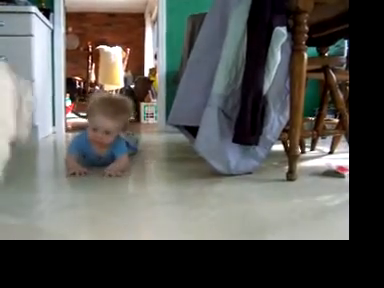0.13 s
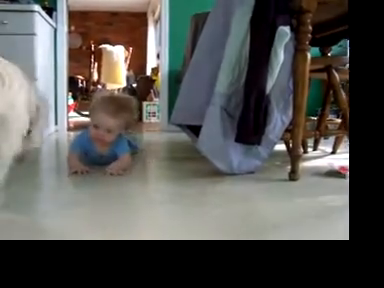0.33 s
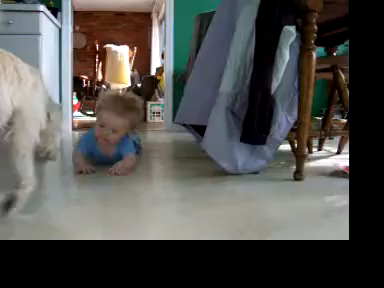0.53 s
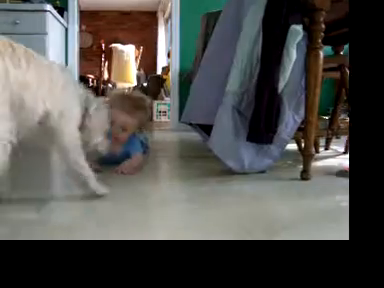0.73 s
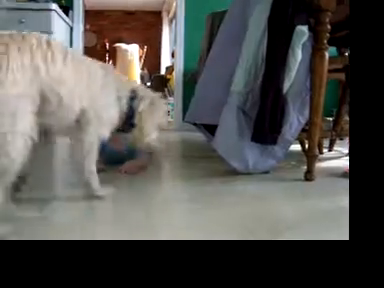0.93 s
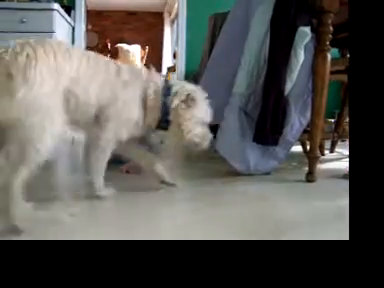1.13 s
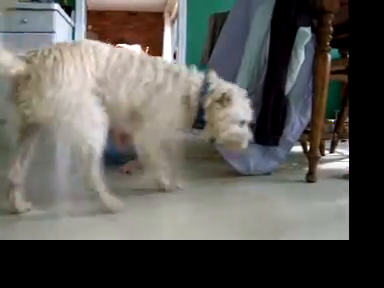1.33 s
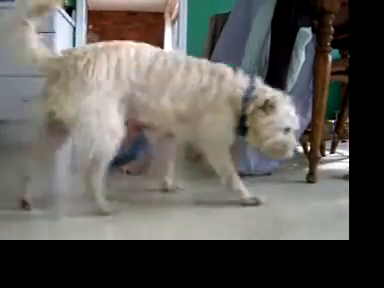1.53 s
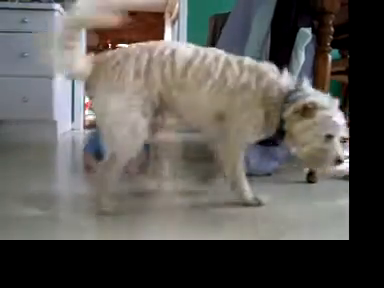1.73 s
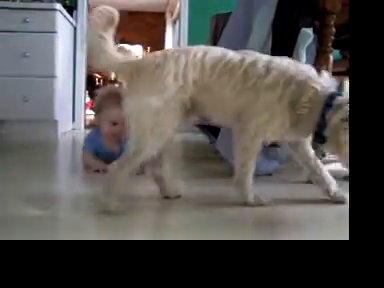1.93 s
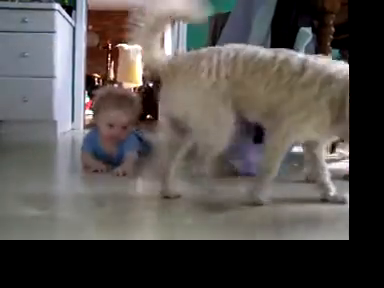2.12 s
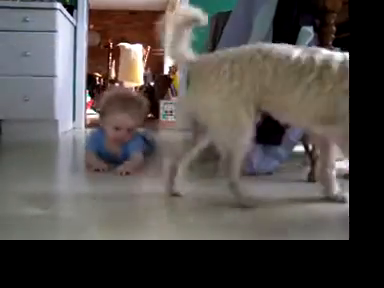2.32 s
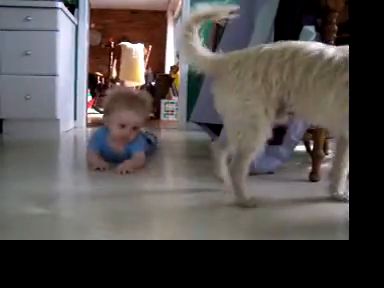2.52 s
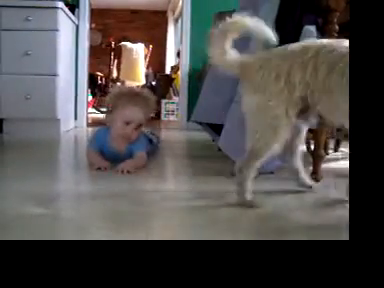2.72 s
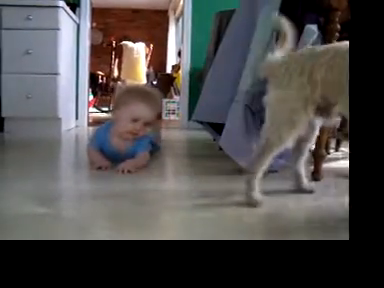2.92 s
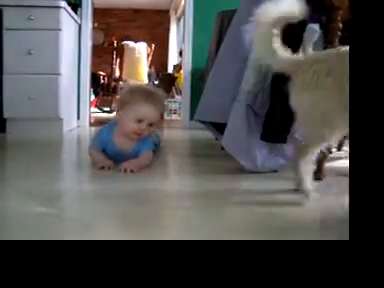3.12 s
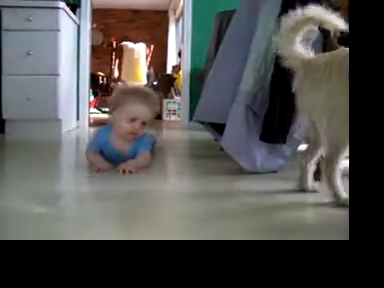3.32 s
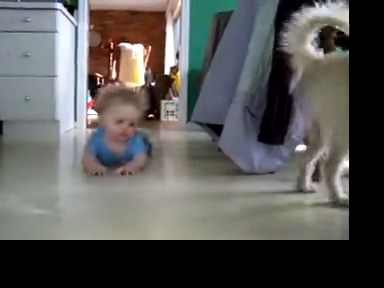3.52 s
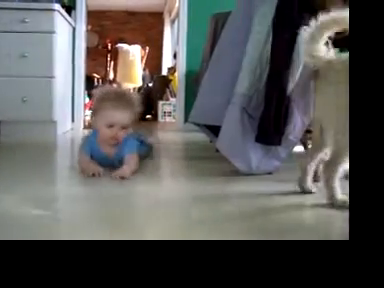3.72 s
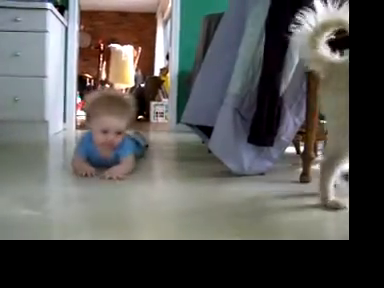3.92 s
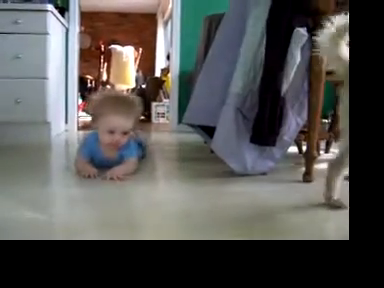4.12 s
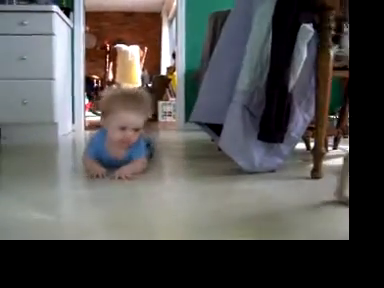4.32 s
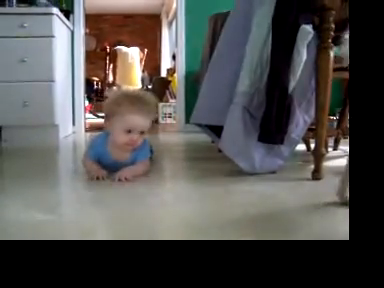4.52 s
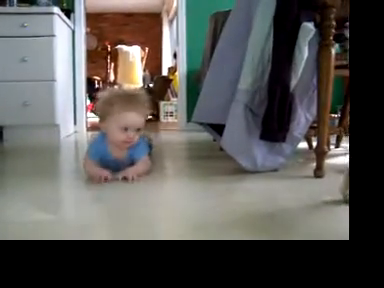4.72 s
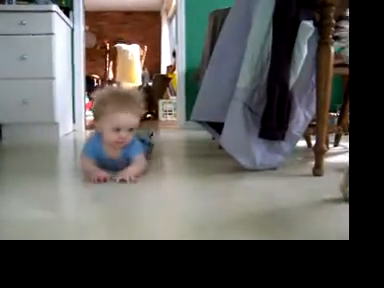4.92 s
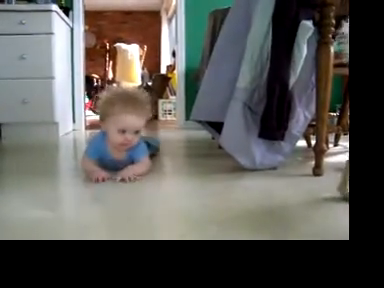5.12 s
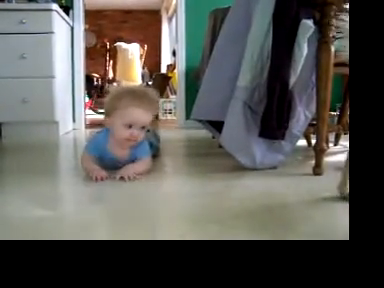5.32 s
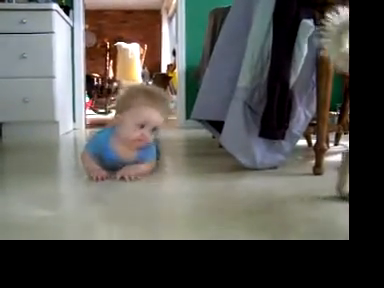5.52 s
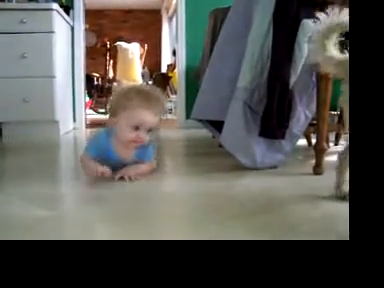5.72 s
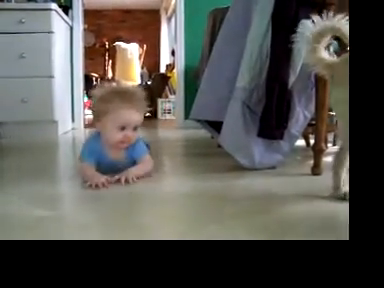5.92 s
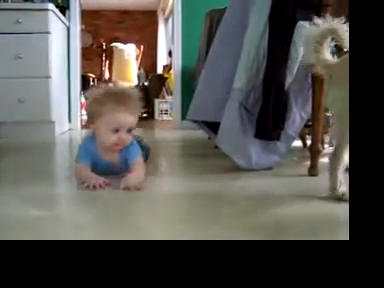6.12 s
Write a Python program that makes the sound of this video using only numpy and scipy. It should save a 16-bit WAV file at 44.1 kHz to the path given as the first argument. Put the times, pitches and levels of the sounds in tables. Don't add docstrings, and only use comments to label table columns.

```python
import sys
import numpy as np
from scipy import signal
from scipy.fft import rfft, irfft, next_fast_len
from scipy.io import wavfile
from scipy.ndimage import uniform_filter1d, map_coordinates

SR = 44100
rng = np.random.default_rng(int(sys.argv[2]) if len(sys.argv) > 2 else 0)


def magnitude_from_level(level_db):
    exponent = np.asarray(level_db, float) / 20
    return 10 ** exponent


def file_out(sig):
    cols = np.atleast_2d(sig).T
    lim = np.clip(cols, -1, 1)
    pcm = np.round(lim * 32767).astype(np.int16)
    wavfile.write(sys.argv[1], SR, pcm)


N = 272097

# (frequency [Hz], density [dB per Hz])
BRIGHT_COLOUR = [(710, -43.5), (1200, -24.5), (1280, -27.5), (2110, -16), (2670, -7.5), (3460, -1.5),
                 (3790, -1), (5840, 1), (6790, -8), (7820, -8), (8790, -8.5), (11400, -38.5), (19300, -120)]


def along(points, hz):
    f, v = np.transpose(points)
    return np.interp(np.log(hz + 1), np.log(f + 1), v)


def curves(rows):
    s, *columns = np.transpose(rows)
    return [np.interp(np.arange(N) / SR, s, column) for column in columns]


def wobble(rate):
    knots = rng.standard_normal(int(N * rate / SR) + 4)
    return map_coordinates(knots, [np.arange(N) * rate / SR])


def coloured(x, spectrum):
    m = next_fast_len(N + 8192)
    gain = magnitude_from_level(along(spectrum, np.fft.rfftfreq(m, 1 / SR)))
    return irfft(rfft(x, m) * gain, m)[:N]


def rush(spectrum, patchy_db):
    z = signal.stft(rng.standard_normal(N + 512), nperseg=512)[2]
    patches = uniform_filter1d(rng.standard_normal(z.shape), size=6, axis=0)
    patches = uniform_filter1d(patches, size=8, axis=1)
    noise = signal.istft(z * magnitude_from_level(patchy_db * patches / patches.std()), nperseg=512)[1][:N]
    x = coloured(noise, spectrum)
    return x / x.std()


def add(track, s, sound):
    start = round(s * SR)
    part = track[max(start, 0):][:len(sound) + min(start, 0)]
    part += sound[max(-start, 0):][:len(part)]


def resonant(x, hz, width_hz):
    centre_hz, q = np.clip(hz, 100, 12000), np.clip(hz / width_hz, .3, 50)
    return signal.lfilter(*signal.iirpeak(centre_hz, q, SR), x)


def highpass(x, order, hz):
    return signal.sosfilt(signal.butter(order, hz, "high", fs=SR, output="sos"), x)


def contacts():
    # (time [s], first claw peak [dB], ring [Hz], second claw against the first [dB])
    pairs = [(.0563, -11, 5120, -11), (.1118, -2, 5890, -18), (.1596, -18, 5610, -3),
             (.8344, -1, 4980, -19), (.8682, -4, 5100, -13), (.8875, -11, 4450, -6),
             (1.0218, -17, 4690, -4), (1.2053, -11, 5210, -2), (1.2096, -8, 5160, -4),
             (1.2215, -9, 5100, -4), (1.3928, -11, 4500, 1), (1.6441, -1.8, 5160, -8),
             (1.8934, -14, 5980, -11), (2.0771, -6, 4700, -1), (2.0958, -12, 4800, -6),
             (2.2581, -14, 5290, -4), (2.415, -9, 6720, -9), (2.5129, -11, 5420, 2),
             (2.8263, -16, 4780, -1), (2.8884, -13, 5720, -4), (2.9563, -15, 5440, -4),
             (3.0786, -14, 5630, -5), (3.0885, -16, 5200, -2), (3.6616, -12, 5700, -3),
             (3.9524, -1.3, 4580, -16), (5.4194, -10, 4790, -4), (5.4263, -7, 4910, -8),
             (5.4706, -7, 5950, -4), (5.8901, -2, 5800, -2), (5.9025, -10, 6200, 1)]
    # (time [s], peak [dB], ring [Hz], rattle after it [dB])
    singles = [(.0505, -11, 4980, -13), (.0746, -13, 5420, -17), (.079, -15, 5310, -18),
               (.426, -12, 5110, -18), (.4314, -14, 5110, -15), (.5008, -17, 5410, -11),
               (.6046, -18, 4330, -6), (.7435, -9, 5600, -12), (.8588, -5, 5000, -13),
               (1.2011, -15, 4980, -8), (1.2162, -14, 5230, -7), (1.3539, -4, 5410, -15),
               (1.6232, -10, 5200, -16), (1.673, -15, 5540, -22), (1.9899, -17, 5210, -10),
               (2.0734, -14, 4930, -5), (2.2786, -16, 6450, -10), (2.2846, -11, 5740, -15),
               (2.4021, -9, 4780, -19), (2.4108, -17, 3350, -9), (2.5056, -15, 5070, -3),
               (2.5088, -7, 5660, -6), (2.8468, -13, 5040, -18), (3.6556, -16, 5630, -6),
               (3.9615, -13, 3770, -14), (5.2072, -10, 5140, -17), (5.2159, -16, 4320, -12),
               (5.6079, -15, 5020, -18), (5.8956, -10, 5630, -9), (5.9439, -14, 5460, -25)]
    # (time [s], peak [dB], ring [Hz])
    brushes = [(.0157, -19, 4620), (.0899, -17, 5440), (.3116, -22, 5910), (.4082, -21, 4710),
               (.5601, -25, 4550), (.6002, -18, 5080), (.7102, -24, 5550), (.8297, -21, 4900),
               (.8447, -20, 5270), (1.157, -20, 5480), (1.1824, -19, 5090), (1.2552, -19, 4900),
               (1.2842, -16, 5200), (1.3169, -18, 5230), (1.337, -19, 4770), (1.4022, -20, 4280),
               (1.7839, -18, 5310), (2.1125, -19, 5450), (2.1436, -23, 5030), (3.1123, -22, 5550),
               (3.5312, -23, 4900), (3.679, -23, 4670), (3.9172, -22, 4600), (4.023, -20, 4270),
               (4.0576, -21, 4480), (4.6413, -21, 4590), (4.8337, -19, 4320), (5.7765, -21, 4600),
               (5.8913, -5, 6300), (6.0976, -18, 4900)]
    second_claw_s, claw_spread_hz = .0025, 300
    pair_rattle_db, brush_rattle_db, rattle_scatter_db = -9, -9, 3.5
    clean_blow = 9.7

    firsts = [(s, db, hz, pair_rattle_db + under_db / clean_blow) for s, db, hz, under_db in pairs]
    notes = rng.standard_normal(len(pairs))
    seconds = [(s + second_claw_s, db + under_db, hz + claw_spread_hz * note, pair_rattle_db)
               for (s, db, hz, under_db), note in zip(pairs, notes)]
    light = [(s, db, hz, brush_rattle_db) for s, db, hz in brushes]
    touches = np.array(firsts + seconds + light)
    touches[:, 3] += rattle_scatter_db * rng.standard_normal(len(touches))
    return np.vstack([touches, singles])


def claws():
    contact_s, push = .00015, .06
    out, t = np.zeros(N), np.arange(-SR // 500, SR // 60) / SR
    contact = np.exp(-.5 * (t / contact_s) ** 2)
    late = np.maximum(t - 2 * contact_s, 0)
    rattle_swell = np.exp(-(late / 0.0016) ** 2) * (1 - np.exp(-late / 0.000067))
    touches = contacts()
    for (s, db, hz, rattle_db), grit in zip(touches, rng.standard_normal((len(touches), len(t)))):
        horn = 1.08 * np.cos(2 * np.pi * hz * t + .25 * grit[0])
        hardness_db = -9 + 4 * (hz - 5000) / 1000
        edge = magnitude_from_level(hardness_db) * np.sin(2 * np.pi * 7800 * t)
        blow = (horn + edge + push) * contact

        chatter = grit * np.abs(grit[::-1])
        chatter = resonant(resonant(chatter, hz, width_hz=3600), hz, width_hz=3600)
        rattle = highpass(chatter, 3, .52 * hz) * rattle_swell
        rattle = magnitude_from_level(rattle_db + 6.5) * rattle / np.abs(rattle).max()
        add(out, s + t[0], magnitude_from_level(db) * (blow + rattle))
    return out


def skids():
    # (time of the middle [s], rms
    # [dB], half length [s], centre [Hz])
    drags = [(0.02, -29, 0.01, 4000), (0.401, -35, 0.016, 4900), (0.416, -34, 0.014, 2910),
             (0.601, -28.5, 0.0072, 4500), (0.86, -25.5, 0.011, 4560), (0.876, -44, 0.0027, 4000),
             (1.03, -32.5, 0.007, 4400), (1.215, -20.5, 0.015, 4550), (1.391, -28, 0.002, 4850),
             (1.644, -25.5, 0.018, 5200), (1.783, -28, 0.0038, 4600), (2.068, -31, 0.006, 5200),
             (2.077, -22.5, 0.011, 4560), (2.09, -22, 0.0046, 4500), (2.255, -25, 0.0079, 4970),
             (2.277, -24, 0.0044, 6500), (2.427, -35, 0.024, 6700), (2.511, -21.5, 0.017, 5400),
             (2.826, -27.5, 0.0069, 3570), (3.083, -25.5, 0.013, 5270), (3.658, -27, 0.011, 4940),
             (3.383, -43, 0.042, 6000), (3.775, -54, 0.033, 4770), (3.909, -38, 0.025, 4100),
             (4.871, -39, 0.088, 4730), (0.743, -12.5, 0.00095, 7850), (4.655, -36, 0.0065, 4600),
             (5.791, -56, 0.0074, 4470), (5.952, -26, 0.044, 5900), (6.098, -30, 0.019, 4680)]
    out, t = np.zeros(N), np.arange(-SR // 6, SR // 6) / SR
    for (s, db, half, hz), (grit, jerk) in zip(drags, rng.standard_normal((len(drags), 2, len(t)))):
        slips = magnitude_from_level(26 * uniform_filter1d(jerk, size=40))
        drag = resonant(resonant(grit * slips, hz, width_hz=3300), hz, width_hz=3300)
        drag = highpass(drag, 5, .62 * hz)
        swell = np.exp(-(t / half) ** 2)
        add(out, s + t[0], magnitude_from_level(db) * swell * drag / drag.std())
    return out


def tags():
    # (time [s], length [s], big tag [dB], middle tag [dB], small tag [dB])
    clinks = [(.743, .085, -60, -39, -30), (.76, .05, -49, -65, -65), (.89, .1, -47, -36, -56),
              (.99, .18, -65, -43, -60), (1.895, .07, -58, -45, -43), (1.98, .06, -65, -48, -47),
              (2.213, .05, -65, -60, -42), (2.278, .12, -65, -60, -32), (2.295, .09, -65, -36, -60),
              (2.415, .09, -65, -39, -41), (2.53, .09, -65, -52, -44), (2.848, .04, -44, -60, -60),
              (2.89, .14, -65, -42, -60)]
    # (frequency [Hz], level [dB], t60 [s])
    discs = [
        [(1490, 0, .5), (6546, -2, .6)],
        [(3268, 0, 1.1)],
        [(3655, 0, .6), (7644, -6, .12), (8420, -7, .08)],
    ]
    out, t = np.zeros(N), np.arange(SR // 3) / SR
    for s, length, *levels in clinks:
        onset = 1 - np.exp(-t / .002)
        free = onset / (1 + np.exp(np.clip((t - length) / .006, -50, 50)))
        for db, modes in zip(levels, discs):
            for hz, mode_db, t60 in modes:
                turn, sway, phase = rng.random(size=3)
                swing = magnitude_from_level(3.5 * np.sin(2 * np.pi * ((16 + 14 * turn) * t + sway)))
                cycles = hz * t + .06 * np.sin(2 * np.pi * (11 * t + turn)) + phase
                ring = magnitude_from_level(db + mode_db - 60 * t / t60) * np.sin(2 * np.pi * cycles)
                add(out, s, ring * swing * free)
    return out


def palms():
    # (time [s], peak below 2 kHz [dB], t60 [s], first contact [dB])
    slaps = [
        (1.641, -44, 0.3, 12),
        (2.372, -34, 0.37, 11.5),
        (2.402, -21.5, 0.48, 8),
        (3.952, -18, 0.46, -16),
        (4.834, -29.5, 0.34, 4),
        (5.085, -27.5, 0.68, 10.5),
        (5.207, -25.5, 0.39, 1),
        (5.419, -27, 0.79, 3.5),
        (5.607, -26, 0.37, 2.5),
        (5.89, -31, 0.68, 12.5),
    ]
    # (frequency [Hz], density [dB per Hz])
    dull_colour = [(120, -24.5), (200, 2), (269, -6), (474, 2.5), (916, -5), (1180, -5.5), (1700, 1),
                   (5000, -4), (6500, -18.5), (11000, -120)]
    knocks, power, t = np.zeros(N), np.zeros(N), np.arange(SR // 2) / SR
    for s, db, t60, knock_db in slaps:
        add(knocks, s, magnitude_from_level(db + knock_db - 60 * t / 0.0028) * np.sin(2 * np.pi * 1300 * t))
        add(power, s, magnitude_from_level(2 * (db - 7.5 - 60 * t / t60)) * (1 - np.exp(-t / 0.0038)))
    return knocks + np.sqrt(power) * rush(dull_colour, patchy_db=.7)


def room():
    # (time [s], starting rms [dB])
    tails = [(.05, -46), (0.11, -35), (.425, -36.5), (0.744, -35.5), (.834, -32.5), (.868, -31.5),
             (1.209, -31), (1.354, -35), (1.395, -37), (1.602, -35.5), (1.645, -28.5), (1.892, -41),
             (1.99, -36.5), (2.076, -31), (2.259, -31), (2.401, -32), (2.512, -31), (2.826, -38.5),
             (2.888, -35.5), (3.085, -53), (3.534, -37), (3.661, -36), (3.956, -26.5), (4.835, -39.5),
             (5.087, -39), (5.21, -30.5), (5.424, -25.5), (5.471, -32.5), (5.608, -40.5), (5.89, -20.5)]
    t60_s = 0.56
    power, t = np.zeros(N), np.arange(SR // 2) / SR
    for s, db in tails:
        add(power, s, magnitude_from_level(2 * (db - 60 * t / t60_s)) * (1 - np.exp(-t / 0.0027)))
    return np.sqrt(power) * rush(BRIGHT_COLOUR, patchy_db=.8)


def scuffs():
    # (time [s], level [dB])
    stir = [(0, -38), (.15, -38.5), (.22, -48.5), (.41, -53), (.57, -41), (.84, -43), (1.32, -40.5),
            (1.44, -59.5), (1.8, -46), (2.34, -49.5), (3.13, -38), (3.35, -51), (3.76, -35.5), (3.9, -47.5),
            (4.47, -41), (4.93, -51.5), (5.48, -38), (6.17, -48)]
    stir_db, = curves(stir)
    return magnitude_from_level(stir_db) * rush(BRIGHT_COLOUR, patchy_db=1)


def house():
    # (time [s], murmur [dB], appliance rumble [dB])
    house_level = [(0, -40.5, -44), (.15, -47.5, -46), (.25, -50.5, -45), (2.7, -51, -46.5),
                   (3.5, -50.5, -43.5), (4.4, -49.5, -47), (4.67, -50.5, -44), (5.53, -48.5, -45.5),
                   (5.9, -54.5, -44), (6, -51, -39.5), (6.17, -53, -47)]
    # (frequency [Hz], density [dB per Hz])
    murmur_colour = [(150, -16), (250, 1), (383, -3.5), (730, 1.5), (1230, -2.5), (2340, -3.5),
                     (3000, -3.5), (3900, -22), (6600, -120)]
    rumble_colour = [(11, -34.5), (18, -9), (48, 3.5), (81, -1.5), (123, 4), (334, -14), (500, -13.5),
                     (650, -17.5), (1100, -120)]
    murmur_db, rumble_db = curves(house_level)
    sway_db = 1.33 * wobble(rate=4.66)
    murmur = magnitude_from_level(murmur_db + sway_db) * rush(murmur_colour, patchy_db=1.0)
    return murmur + magnitude_from_level(rumble_db) * rush(rumble_colour, patchy_db=-1.5)


def scene():
    dog = claws() + skids() + tags() + scuffs()
    return (dog + palms() + room() + house())[None]


def top_cut(x):
    return signal.sosfilt(signal.butter(12, 15700, fs=SR, output="sos"), x)


def record(dry):
    # (frequency [Hz], gain [dB])
    band_limit = [(7200, -1.5), (8200, -15.5), (8800, -25), (9300, -49.5), (9800, -120)]
    clip_level = .69
    heard = np.clip(coloured(dry[0], band_limit), -clip_level, clip_level)[None]
    return top_cut(heard)


dry = scene()
out = record(dry)
file_out(out)
```